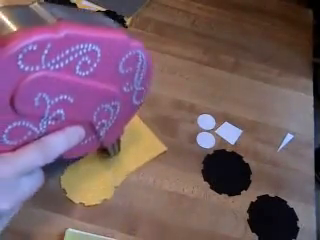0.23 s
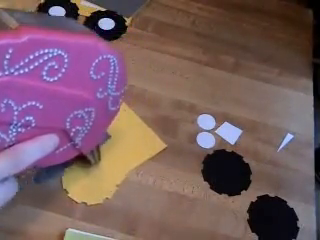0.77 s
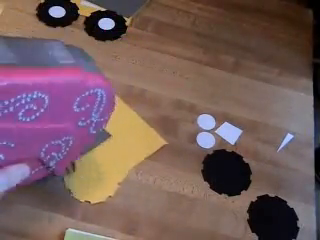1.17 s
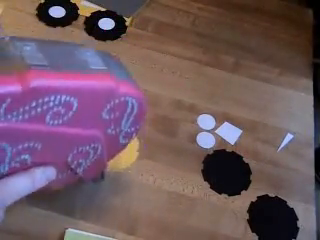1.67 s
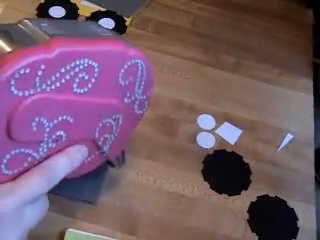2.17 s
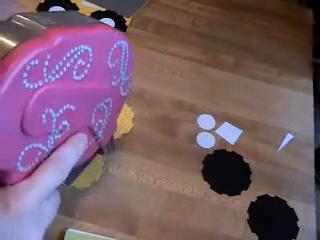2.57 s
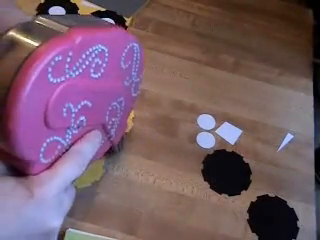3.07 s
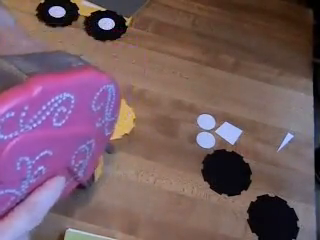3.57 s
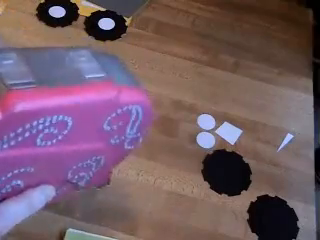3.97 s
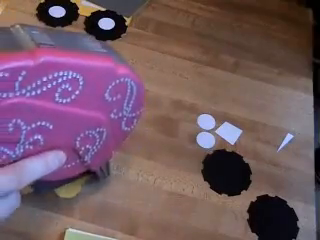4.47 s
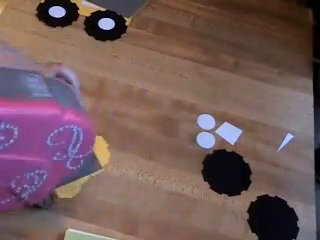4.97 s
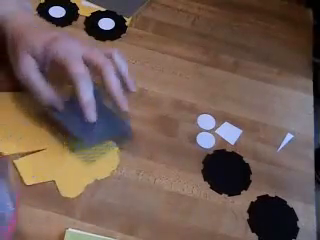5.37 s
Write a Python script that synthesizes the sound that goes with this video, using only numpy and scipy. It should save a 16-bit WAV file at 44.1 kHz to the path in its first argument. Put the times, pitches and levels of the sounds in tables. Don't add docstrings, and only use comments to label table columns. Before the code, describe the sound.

Close camera microphone, quiet room: faint hum, low rumble, hiss and soft regular ticks. A plastic dispenser is set on paper and dragged three times, each drag a dull grainy rattle with hollow knocks, followed by bright clicks and short tape crackles. Light sliding and sparse taps fill the gaps. A hard knock precedes the last, fastest drag; a sharp clatter closes.

```python
import sys
import numpy as np
from scipy import signal
from scipy.fft import rfft, irfft, next_fast_len
from scipy.io import wavfile
from scipy.ndimage import uniform_filter1d

SR = 44100
rng = np.random.default_rng(int(sys.argv[2]) if len(sys.argv) > 2 else 0)


def boost_factor(decibels):
    exponent = np.asarray(decibels, float) / 20
    return 10 ** exponent


def materialize(psi):
    bounded = np.clip(np.atleast_2d(psi).T, -1, 1)
    quanta = np.round(bounded * 32767).astype(np.int16)
    wavfile.write(sys.argv[1], SR, quanta)


N = 247205

# frequency in Hz, level in dB, t60 in seconds.
TABLE_MODES = [(46.8, -19, .15), (95, -32, 0.059), (137, -18, 0.18), (174.6, 0, 0.14), (207.4, 0, 0.13),
               (265.6, -7.5, 0.16), (325, -15.5, 0.024)]
# frequency in Hz, level in dB, t60 in seconds.
SHELL_MODES = [(1077, 5.5, 0.037), (1280, 2, 0.034), (1428, 10, 0.015), (1609, 10, 0.017), (1754, 7, 0.02),
               (1900, 5, 0.022), (2170, -2.5, 0.04), (2360, -6.5, 0.0089), (2676, -0.5, 0.017),
               (3050, -17.5, 0.014)]


def level(x, db):
    return x * boost_factor(db) / np.sqrt(np.mean(x ** 2))


def peak(x, db, size=8192):
    return x[:size] * boost_factor(db) / np.abs(x).max()


def band(x, lo_hz, hi_hz, order=2):
    return signal.sosfilt(signal.butter(order, [lo_hz, hi_hz], "band", fs=SR, output="sos"), x)


def colour(x, points):
    hz, db = np.transpose(points)
    size = next_fast_len(len(x))
    bin_hz = np.arange(size // 2 + 1) * SR / size
    gain = boost_factor(np.interp(np.log(bin_hz + 1), np.log(hz), db))
    return irfft(rfft(x, size) * gain, size)[:len(x)]


def walk(rate):
    k = int(SR / rate)
    held = np.repeat(rng.standard_normal(N // k + 1), k)
    return 0.994 * uniform_filter1d(uniform_filter1d(held, k), k)[:N]


def ring(modes, size=4096, longest=.3):
    hz, db, t60 = np.transpose(modes)[:, :, None]
    t = np.arange(size) / SR
    decay = boost_factor(db - 60 * t / np.clip(t60, .004, longest))
    swing = np.sum(decay * np.sin(2 * np.pi * hz * t), axis=0)
    return band(swing, .8 * hz.min(), 1.5 * hz.max())


def slips(rate, scatter_db):
    hit = rng.random(N) < rate / SR
    size = boost_factor(scatter_db * np.minimum(rng.exponential(size=N), 3.5))
    return level(hit * size * rng.choice([-1, 1], N), 0)


def arches(rows, power):
    t = np.arange(N) / SR
    return sum(boost_factor(db) * np.abs(np.sin(np.pi * np.clip((t - s) / d, 0, 1))) ** power for s, d, db in rows)


def hiss():
    # frequency in Hz, density in dB per Hz.
    mid_points = [(140, 2), (230, 5.5), (512, -0.5), (559, -0.5), (834, -9), (1440, -11), (1940, -13),
                  (2500, -6), (3210, -17), (6830, -15.5), (7920, -52.5), (10300, -56), (17400, -120)]
    # frequency in Hz, side minus mid in dB.
    width = [(60, -32.5), (100, -42.5), (180, -9.5), (300, 4.5), (510, -3), (880, 5.5), (1500, 10),
             (2560, -1), (4370, 12), (7470, -17)]
    hz, mid_db = np.transpose(mid_points)
    width_hz, width_db = np.transpose(width)
    side_db = mid_db + np.interp(np.log(hz), np.log(width_hz), width_db)
    mid, side = rng.standard_normal((2, N))
    both = np.array([colour(mid, mid_points), colour(side, np.c_[hz, side_db])])
    return both * boost_factor(-55.5 + 0.35 * walk(4.8)) / np.std(band(both[0], 280, 8000))


def rumble():
    # frequency in Hz, density in dB per Hz.
    rumble_points = [(10, 4.5), (30, 2), (75, 16), (150, 0.5), (260, -25.5), (500, -62.5)]
    rumble_db = -56
    mid, side = rng.standard_normal((2, N))
    return np.array([level(colour(mid, rumble_points), rumble_db),
                     level(colour(side, rumble_points), rumble_db - 15.5)])


def mains_hum():
    hz = 117.6 + 0.75 * walk(1.93)
    return boost_factor(-51.5 + 0.6 * walk(1.4)) * np.sqrt(2) * np.sin(2 * np.pi * np.cumsum(hz) / SR)


def fan_drone():
    centre_hz, width_hz = 190, 17.2
    air = rng.standard_normal(N)
    return level(band(air, centre_hz - width_hz / 2, centre_hz + width_hz / 2, order=1), -50)


def camera_ticks():
    start_s, period_s, offbeat_s, offbeat_db = .0405, .1001, .048, -5
    tick_hz, tick_db, swell_s = 1800, -48.5, .003
    beats = np.arange(start_s, N / SR - .06, period_s)
    size = boost_factor(2 * rng.standard_normal((len(beats), 2)) + [0, offbeat_db])
    train = np.zeros(N)
    train[((beats[:, None] + [0, offbeat_s]) * SR).astype(int)] = size
    t = np.arange(1024) / SR
    tick = t / swell_s * np.exp(1 - t / swell_s) * np.sin(2 * np.pi * tick_hz * t)
    return boost_factor(tick_db) * signal.fftconvolve(train, tick)[:N]


def background():
    tones = np.array([[1], [-.04]]) * (mains_hum() + fan_drone())
    ticks = np.array([[0.23], [.9]]) * camera_ticks()
    return hiss() + rumble() + tones + ticks


def hand():
    # start in seconds, length in seconds, level in dB.
    slides = [
        (-.2, 0.53, -68),
        (.52, 0.13, -60.5),
        (1.21, 0.47, -55),
        (1.55, 0.56, -59),
        (2.2, 0.56, -67),
        (3.07, 0.29, -61),
        (3.85, 0.43, -54.5),
        (4.62, 0.12, -56.5),
        (5.1, 0.37, -54),
        (5.35, 0.57, -62),
    ]
    # start, press-down, hold and lift in seconds, pressure in dB.
    strokes = [
        (0.716, 0.12, 0.25, 0.092, -37.5),
        (3.363, 0.11, 0.21, 0.091, -36),
        (4.801, 0.063, .15, 0.024, -33),
    ]
    # start in seconds, length in seconds, speed in dB.
    pulls = [
        (.72, 0.49, -38.5),
        (3.4, 0.39, -38.5),
        (4.73, 0.37, -34.5),
    ]
    # start in seconds, length in seconds, level in dB.
    settles = [
        (1.22, 0.21, -46),
        (1.6, .32, -54),
        (3.08, 0.19, -46),
        (4.63, 0.21, -39.5),
        (5.12, 0.23, -46.5),
    ]
    t = np.arange(N) / SR
    pressure = sum(boost_factor(db) * np.interp(t, np.cumsum([s, down, hold, lift]), [0, 1, 1, 0])
                   for s, down, hold, lift, db in strokes)
    speed = arches(pulls, 1.7)
    settle = arches(settles, 2.7)
    hollow = boost_factor(-58) + pressure + settle
    shell = boost_factor(-56.5) + speed + boost_factor(-9.5) * settle
    card = boost_factor(-64.5) + boost_factor(-22.5) * speed ** 0.72 + arches(slides, 1.0)
    return 20 * np.log10([hollow, shell, card])


def rustle(db):
    # frequency in Hz, density in dB per Hz.
    card_points = [(290, -13.5), (500, -8), (724, -8), (1000, -6), (1720, -6.5), (2020, -7), (5660, -6),
                   (7920, -13.5), (10300, -62), (17400, -120)]
    # start in seconds, length in seconds, level in dB.
    crackles = [(1.311, 0.078, -32), (1.442, 0.059, -41), (3.935, 0.045, -25), (5.164, 0.083, -33.5),
                (5.331, 0.089, -47), (2.428, 0.064, -52), (1.783, 0.23, -48.5), (2.156, 0.051, -47),
                (2.192, 0.051, -52), (2.543, 0.086, -53), (2.747, 0.033, -44), (3.554, 0.21, -51.5),
                (4.075, 0.21, -49)]
    slide = level(colour(rng.standard_normal(N), card_points), 0) * boost_factor(db + 1.5 + 2.2 * walk(40))
    crackle = level(colour(slips(rate=1300, scatter_db=2), card_points), 0) * boost_factor(0.6 * walk(150))
    return slide + arches(crackles, 1) * crackle


def roller(hollow_db, shell_db):
    # frequency in Hz, level in dB, t60 in seconds.
    pressed_hollow = [(422, -4, 0.095), (541.4, -10, 0.21), (656.6, -2.5, 0.2), (692.4, 5.5, 0.069),
                      (728.5, 6.5, 0.051), (810, -5, 0.042), (860, -15, 0.058), (1038, -9, 0.054)]
    # frequency in Hz, level in dB, t60 in seconds.
    gear_teeth = [(2930, -2, .03), (3880, -11, 0.027), (4160, -7.5, 0.034)]
    # parts, drive in dB, share of the ring time left
    driven = [(pressed_hollow, hollow_db, 1), (SHELL_MODES, shell_db, .8),
              (TABLE_MODES[2:], hollow_db - 11.5, .6), (gear_teeth, shell_db - 13.5, 1)]
    out, judder = 0, walk(70)
    for modes, db, damp in driven:
        response = ring([(hz, mode_db, damp * t60) for hz, mode_db, t60 in modes])
        response = response / np.sqrt(np.sum(response ** 2))
        force = slips(rate=2500, scatter_db=1.0) * boost_factor(1.9 * judder + 1.5 * walk(120) + db)
        out = out + signal.fftconvolve(force, response)[:N]
    return out


def knock(hollow_db, shell_db, crack_db, panel_hz, contact_ms, swell, top_hz=3400, size=4096):
    # frequency in Hz, level in dB, t60 in seconds.
    hollow_modes = [(396, -8.5, 0.2), (554, -8, 0.088), (666, 2.5, 0.081), (721, -2.5, 0.077),
                    (748.6, -2, 0.061), (821, -2, 0.035), (913, -12.5, 0.025), (1047, -4, 0.084)]
    chatter, fizz = rng.standard_normal((2, size))
    fade = np.arange(size) / SR / (max(contact_ms, .3) / 1000)
    force = fade ** swell * np.exp(-fade)
    push = chatter * np.abs(chatter) * force
    push[2] += 9 * force[2]

    def struck(modes):
        spot = [(hz, db + 2 * rng.standard_normal(), t60) for hz, db, t60 in modes]
        return signal.fftconvolve(push, ring(spot, longest=.08))[:size]

    hollow = struck(hollow_modes)
    shell = struck(SHELL_MODES)
    panel = signal.fftconvolve(push, ring([(panel_hz, 0, .015)]))[:size]
    slap = band(push, 876, 2400)
    crack = band(band(fizz * np.abs(fizz) * force, 1900, 6840), 1000, top_hz)
    panel_db = crack_db - 1.0 if panel_hz > 3100 else shell_db - 4.5
    body = peak(hollow, hollow_db) + peak(shell, shell_db + 0.5) + peak(panel, panel_db)
    return body + peak(slap, shell_db - 4.0) + peak(crack, crack_db + 3.5)


def pawl_clicks():
    # time in seconds, crack peak in dB, hollow peak in dB, loudest panel in Hz.
    clicks = [(0.036, -39.5, -62, 2700), (0.043, -38.5, -41, 2440), (1.005, -37.5, -29.5, 3020),
              (5.105, -21, -21.5, 2100), (1.302, -23.5, -32, 4110), (1.323, -28, -39, 4660),
              (1.347, -20, -23.5, 2600), (1.364, -19.5, -24.5, 6040), (1.477, -20, -25.5, 3650),
              (1.752, -23, -28, 3050), (2.245, -40.5, -47, 2740), (2.415, -39.5, -58, 2690),
              (2.44, -44.5, -62, 2740), (2.757, -52, -42, 3620), (3.175, -19.5, -24, 2820),
              (3.821, -20, -18, 2680), (3.863, -36.5, -40, 3880), (3.897, -42.5, -39.5, 2220),
              (3.925, -27.5, -37, 3830), (3.94, -33.5, -43, 2620), (3.953, -22.5, -20, 5590),
              (4.862, -31.5, -35, 4100), (4.88, -30, -25, 3840), (5.174, -33.5, -37, 4130),
              (5.179, -37, -30, 3540), (5.214, -24.5, -45, 2270), (5.22, -23.5, -28.5, 2440),
              (5.453, -39.5, -61, 5200)]
    return [(s, knock(hollow, crack - 3, crack, hz, 3.6 * (2880 / hz) ** 0.81, swell=0.15, top_hz=7140))
            for s, crack, hollow, hz in clicks]


def case_knocks():
    # time in seconds, hollow peak in dB, shell peak in dB, loudest panel in Hz, contact in ms.
    hits = [(0.078, -23, -34.5, 2000, 0.58), (0.099, -52, -48, 2190, 1.6), (0.601, -13.5, -17, 1980, 3.4),
            (0.716, -26.5, -27, 1760, 5.2), (0.737, -23.5, -24.5, 2390, 6), (0.933, -26, -27, 3050, 3.7),
            (0.96, -37.5, -33.5, 2950, 5), (1.047, -18.5, -21.5, 2930, 2.3), (1.136, -29, -24.5, 4030, 3.4),
            (2.337, -20.5, -20, 1965, 3.5), (3.13, -37, -32.5, 2260, 4.7), (3.237, -24, -18, 2360, 3.7),
            (3.482, -21.5, -32, 2940, 3.6), (3.779, -34.5, -39.5, 2130, 3.4), (3.837, -22, -31, 2140, 2),
            (3.984, -27.5, -30, 2640, 5.5), (4.083, -18.5, -20.5, 1830, 2.6),
            (4.662, -11.5, -16, 2190, 2.0), (4.683, -11, -17, 2520, 3.4), (1.25, -18, -13.5, 2420, 3),
            (5.581, 0, -1.5, 2620, 3.2), (5.588, -22, -15.5, 2830, 8.3), (5.599, -10, -10, 2090, 0.74)]
    sounds = []
    for s, hollow, shell, hz, ms in hits:
        crack = shell - 6.5 + 1.5 * np.log2(hz / 2400) + 2 * np.log2(ms / 3)
        sounds.append((s, knock(hollow, shell, crack, hz, ms, swell=0.2, top_hz=1.86 * hz)))
    return sounds


def table_thuds():
    # time in seconds, peak in dB.
    blows = [(0.601, -32.5), (0.808, -31.5), (0.851, -43), (1.475, -34.5), (1.752, -24.5), (2.334, -38),
             (3.086, -26.5), (3.175, -29.5), (3.446, -30.5), (3.465, -24.5), (3.818, -49), (4.083, -34.5),
             (4.662, -14), (4.682, -14), (4.748, -25), (4.777, -32), (5.106, -38), (5.217, -32.5),
             (5.578, -16), (5.586, -19.5)]
    push = np.exp(-np.arange(400) / SR / 0.00052)
    thud = signal.fftconvolve(push, ring(TABLE_MODES, size=8192))
    return [(s, peak(thud, db)) for s, db in blows]


def roller_lurches():
    # time in seconds, hollow peak in dB, shell peak in dB, loudest panel in Hz.
    lurches = [(0.688, -35.5, -42.5, 1900), (0.833, -20, -31, 1620), (0.847, -28, -33.5, 1660),
               (0.894, -35, -37, 1640), (0.916, -16, -28.5, 1265), (0.993, -21.5, -25, 1630),
               (1.021, -26, -38, 1710), (3.078, -21.5, -37, 1340), (3.143, -29, -44, 1800),
               (3.366, -29, -36, 1250), (3.432, -33, -31.5, 1280), (3.651, -34, -29, 1510),
               (3.677, -22.5, -33.5, 1380), (4.224, -28, -37, 1860), (4.744, -42, -44.5, 1900),
               (4.815, -25, -31, 1300), (4.904, -26, -21, 1510), (4.952, -21, -26.5, 1350),
               (4.965, -18.5, -23, 1600), (5.054, -29.5, -49, 1540), (5.126, -28.5, -55, 2210)]
    return [(s - .004, knock(hollow, shell, shell - 8, hz, 1.84, swell=2.95))
            for s, hollow, shell, hz in lurches]


def soft_bumps():
    # time in seconds, hollow peak in dB, shell peak in dB, loudest panel in Hz.
    bumps = [
        (0.805, -20.5, -17.5, 1650),
        (1.273, -16.5, -16.5, 1250),
        (1.507, -24.5, -26, 1430),
        (3.088, -12, -18, 1274),
        (3.398, -42, -37.5, 6200),
        (3.446, -20, -20, 2400),
        (4.198, -33, -41, 1520),
        (4.926, -29, -21, 1280),
    ]
    return [(s - .004, knock(hollow, shell, shell - 3.5, hz, 2.18, swell=3.0, top_hz=5070))
            for s, hollow, shell, hz in bumps]


def contacts():
    out = np.zeros(N + 8192)
    for s, x in pawl_clicks() + case_knocks() + table_thuds() + roller_lurches() + soft_bumps():
        start = int(s * SR)
        out[start:start + len(x)] += x
    return out[:N]


def echo(x, t60):
    t = np.arange(SR // 2) / SR
    tail = rng.standard_normal(len(t)) * boost_factor(-60 * t / t60) * (1 - np.exp(-t / 0.0024))
    return signal.fftconvolve(x, tail / np.sqrt(np.sum(tail ** 2)))[:N]


def scene():
    room_t60_s, desk_t60_s = 0.16, 0.021
    hollow_db, shell_db, card_db = hand()
    near = contacts() + roller(hollow_db, shell_db) + rustle(card_db)
    mid = near + boost_factor(-11) * band(echo(near, room_t60_s), 130, 8800, order=1)
    wide = boost_factor(-14) * echo(near, room_t60_s) + boost_factor(-9.5) * echo(near, desk_t60_s)
    side = -.07 * mid + band(wide, 900, 6000, order=1)
    mid, side = np.array([mid, side]) + background()
    return np.array([mid + side, mid - side])


def band_limit(x):
    return signal.sosfilt(signal.butter(12, 8070, fs=SR, output="sos"), x)


def record(dry):
    dry = .8 * np.tanh(dry / .8)
    mid, side = (dry[0] + dry[1]) / 2, (dry[0] - dry[1]) / 2
    side = signal.sosfiltfilt(signal.ellip(8, .1, 40, 3900, fs=SR, output="sos"), side)
    mid = signal.sosfilt(signal.ellip(10, .2, 70, 7900, fs=SR, output="sos"), mid)
    stop = np.minimum(np.arange(N)[::-1] / 40, 1)
    return band_limit(stop * np.array([mid + side, mid - side]))


dry = scene()
out = record(dry)
materialize(out)
```